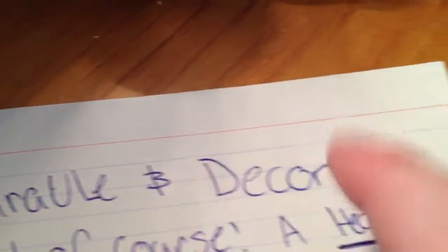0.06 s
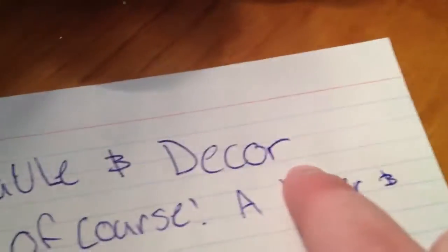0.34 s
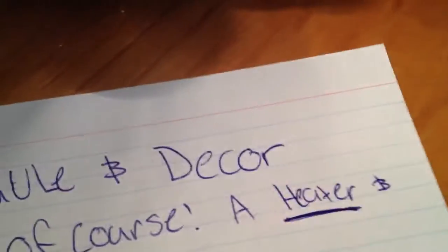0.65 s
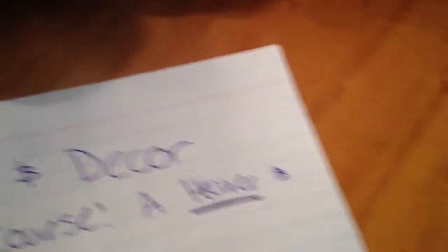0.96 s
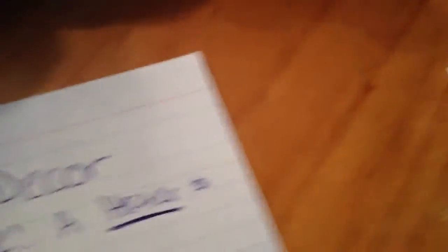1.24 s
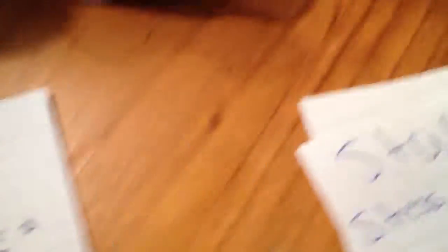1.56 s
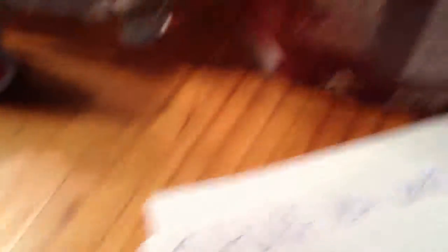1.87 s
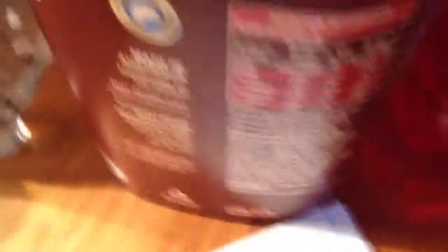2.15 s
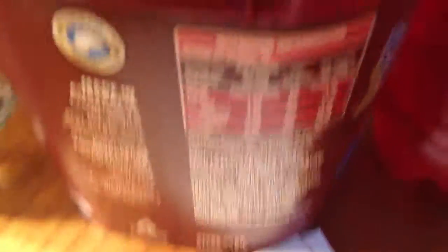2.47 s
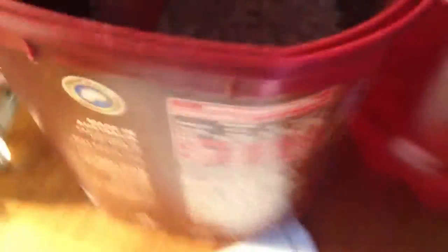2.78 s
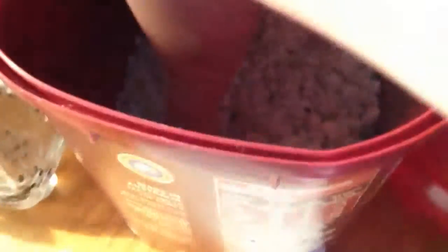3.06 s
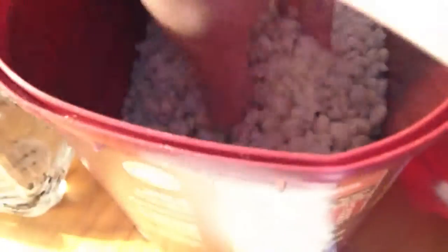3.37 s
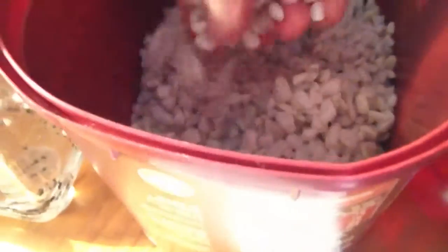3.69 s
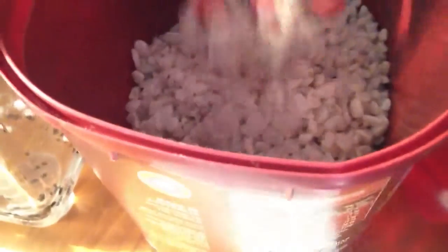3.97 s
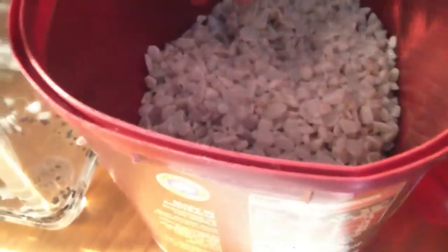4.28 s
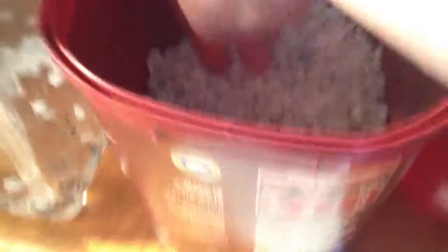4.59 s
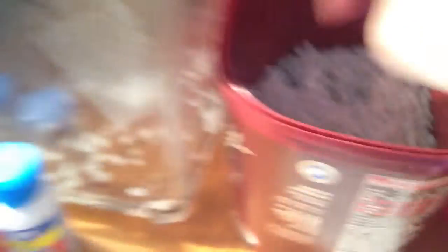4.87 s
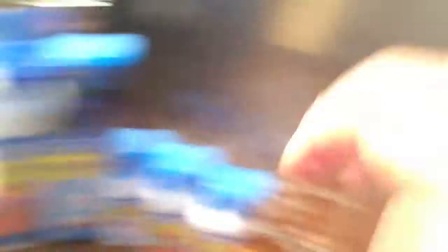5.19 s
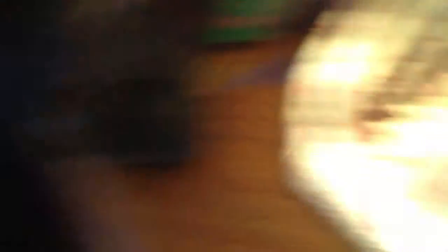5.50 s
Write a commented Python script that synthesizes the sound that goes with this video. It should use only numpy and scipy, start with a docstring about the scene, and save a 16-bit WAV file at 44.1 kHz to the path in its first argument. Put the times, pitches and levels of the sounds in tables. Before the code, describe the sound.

A faint fan hum runs throughout in a quiet, fairly dry room, with everything close to the microphone. At about 0.2 seconds a finger taps a wooden table once, a click with a short thump. The microphone's casing gives a small dry click near 1.1 seconds, and a hand slides softly over paper at 1.3, followed by very faint rustles. Around 2.7 seconds a plastic tub of fine gravel is bumped, giving a cluster of short hollow knocks. From 3.0 fingers dig in, the stones grinding, scraping the wall and slipping off in small spills. The sharpest knocks on the plastic come around 3.8 seconds, as a handful trickles back in a bright spray of tiny ticks, fullest near 4.0 and over by 4.4. From 4.7 to about 5.4 seconds an arm brushes quietly past, with a few soft bumps on the table.

```python
"""A finger taps a wooden table in a quiet room with a humming fan. The microphone's casing clicks
and a hand slides over paper. A plastic tub of fine gravel is bumped; fingers dig in, grinding the
stones together, lift a handful and let it trickle back in a spray of tiny collisions, the larger
stones knocking on the tub and ringing its wall. Then an arm brushes past, with a few soft bumps
on the table."""
import sys
import numpy as np
from scipy import signal
from scipy.fft import rfft, irfft, next_fast_len
from scipy.io import wavfile

SR = 44100
rng = np.random.default_rng(int(sys.argv[2]) if len(sys.argv) > 2 else 0)


def dump_mix(stems):
    """Bounce the given channels to the path in sys.argv[1] as a 16-bit WAV at rate SR."""
    frames = np.atleast_2d(stems).T  # one column per channel
    limited = np.clip(frames, -1, 1)  # hard clip at full scale
    pcm = np.round(limited * 32767).astype(np.int16)
    wavfile.write(sys.argv[1], SR, pcm)


N = 244314
T = np.arange(N) / SR


# Tone of the shaken tub, the grinding heap, the trickle and the larger stones.
# Each row: frequency in Hz, gain in dB.
RUMBLE_EQ = [(90, -28.5), (160, -8.5), (290, 6.5), (420, 0), (600, -12.5), (1200, -41)]
GRIND_EQ = [(240, -48), (400, -17), (480, 1.5), (512, 5), (665, 4), (909, -5.5), (1280, -1), (1740, -3),
            (2480, -6.5), (3760, -9), (4400, -7), (5410, -12.5), (9000, -13.5), (11700, -38), (19800, -120)]
TRICKLE_EQ = [(1500, -28.5), (3000, -16), (5000, -6.5), (7500, 2.5), (10000, 2.5), (13000, 8), (15200, 5.5)]
STONE_EQ = [(300, -23.5), (1200, -3), (3000, -12), (6000, -5), (13000, 3)]
# Larger stones landing on the heap. Each row: start in seconds, level in dB.
STONE_LANDINGS = [(3.552, -42), (3.679, -30), (3.765, -30), (3.773, -24.5), (3.803, -24), (3.875, -26),
                  (3.891, -21), (3.988, -21.5), (4.033, -24), (4.063, -23.5), (4.111, -25.5),
                  (4.155, -34.5), (4.180, -35.5), (4.2224, -36.5), (4.2549, -28.5), (4.324, -31.5),
                  (4.330, -35)]

def gravel():
    """Packed stones grind and shake the tub; loose ones trickle over the top."""
    rumble, grind, scrape, trickle = gravel_envelopes()
    out = rumble * colour(grains(per_s=1700, spread_db=0.5), RUMBLE_EQ)
    out += amp(-0.4) * grind * colour(grains(per_s=2500, spread_db=2.5), GRIND_EQ)
    # stones scraping along the wall set it ringing
    wall = struck(wall_modes(spot_hz=1310)) + struck(wall_modes(spot_hz=2530))
    slips = scrape * rms_one(grains(per_s=650, spread_db=4.5))
    out += amp(-4.0) * resonate(slips, cut(wall, 1200, "high"))
    # a weak trickle thins out into separate ticks
    full_flow_db, thinning, least_flow = -35, 0.8, 0.18
    flow = np.clip((trickle / amp(full_flow_db)) ** thinning, least_flow, 1)
    stone_size = trickle * np.sqrt(flow.mean() / flow)
    ticks = pebbles(per_s=4000 * flow, spread_db=1.0, cycles=3.9)
    out += amp(-1.8) * stone_size * colour(ticks, TRICKLE_EQ)
    # now and then a bigger stone ticks out of the trickle
    out += amp(-11.5) * trickle * colour(pebbles(per_s=160, spread_db=3.5, cycles=4.0), STONE_EQ)
    for s, db in STONE_LANDINGS:
        # the tail is the dislodged stones coming to rest
        landing = crack(0.0038, tail_db=-13.5, tail_t60=0.036, spectrum=STONE_EQ, high_hz=16000)
        add(out, s, amp(db) * landing)
    return out


# Effort of the fingers as they dig in and lift a handful. Each row: time in seconds, level in dB.
DIG_EFFORT = [(2.975, -72), (3.005, -43.5), (3.10, -45), (3.17, -39), (3.225, -43.5), (3.40, -47),
              (3.47, -53.5), (3.58, -56.5), (3.86, -51.5)]
# The packed heap shifts after a jolt. Each row: start in seconds, hold in seconds, level in dB.
HEAP_SHIFTS = [(2.72, 0.011, -53), (2.793, 0.011, -52.5), (2.852, .01, -60), (2.944, 0.015, -50.5),
               (3.806, 0.034, -42), (3.893, .04, -44)]
# Clumps slip off the fingers. Each row: peak time in seconds, level in dB, rise in seconds.
CLUMP_SPILLS = [(3.13, -33, .012), (3.257, -32, .025), (3.376, -34.5, .09), (3.497, -43, .03),
                (4.064, -30.5, .004), (4.258, -36.5, .004), (4.331, -54, .006)]

def gravel_envelopes():
    """Pushed and falling stones together ride the levels of rumble, grind, scrape and trickle."""
    dig_s, dig_db = np.transpose(DIG_EFFORT)
    effort = amp(np.interp(T, dig_s, dig_db, left=-150, right=-150))
    shifts = sum(swell(s, hold, db, rise=0.025, fall=0.051) for s, hold, db in HEAP_SHIFTS)
    spills = sum(swell(s, hold=0.0037, db=db, rise=rise, fall=0.062) for s, db, rise in CLUMP_SPILLS)
    pour = swell(s=3.975, hold=0.11, db=-32, rise=0.29, fall=0.096)   # the hand opens
    pushed = np.hypot(effort, shifts)
    falling = np.hypot(spills, pour)
    # digging loosens the heap, so it sheds more stones; a mere shift sheds few
    loosen_from_s, loosen_takes_s, packed_db, loose_db = 3.063, 0.43, -3.5, 9
    loose = np.interp(T, [loosen_from_s, loosen_from_s + loosen_takes_s], [0, 1])
    shed = effort * amp(packed_db + loose * (loose_db - packed_db)) + shifts * amp(-14)
    # pushed stones shake the tub; falling ones grind and shake it far less
    rumble = np.hypot(amp(-7.5) * pushed, amp(-26) * falling)
    grind = np.hypot(pushed, amp(-15) * falling)
    scrape = grind * amp(-5.5 * loose)   # a loosened heap presses less on the wall
    trickle = np.hypot(shed, falling)
    return rumble, grind, scrape, trickle


def pebbles(per_s, spread_db, cycles, count=24):
    """Collisions dealt to stones of many sizes, each ringing for a few cycles."""
    pitches = np.geomspace(2500, 15000, count)
    return sum(ring(grains(per_s / count, spread_db), hz, cycles / hz) * hz for hz in pitches)


# Knocks on the tub. Each row: start in seconds, strength in dB, brightness of the contact in Hz,
# pitch that the struck spot favours in Hz.
KNOCKS = [ (2.6601, -23.5, 2200, 1400), (2.6685, -29.5, 5500, 2070), (2.7166, -36, 5000, 2100),
          (2.724, -34.5, 6000, 3100), (2.735, -29.5, 5500, 3130), (2.7916, -41, 5000, 1300),
          (2.8606, -38.5, 3300, 2470), (2.945, -43, 3500, 1300), (2.960, -46, 8500, 1300),
          (2.990, -40.5, 9000, 1300), (3.016, -28.5, 5000, 1380), (3.1165, -32, 8000, 2600),
          (3.1294, -33.5, 11000, 2600), (3.1406, -24.5, 5500, 1300), (3.189, -25.5, 6000, 2480),
          (3.534, -34.5, 5500, 570), (3.599, -31, 4500, 440), (3.649, -22.5, 7600, 2370),
          (3.7908, -12.5, 8450, 6500), (3.8069, -20, 8000, 3500), (3.8148, -30.5, 7000, 3800),
          (3.828, -21.5, 8300, 3800), (3.8962, -22, 5800, 680), (3.9225, -33.5, 6500, 700),
          (3.9448, -23.5, 7000, 1320)]
# Tone of a knock's attack. Each row: frequency in Hz, gain in dB.
CRACK_EQ = [(200, -19.5), (700, 0), (1400, -1), (2100, 0), (3100, 0), (4400, 0), (5200, -1), (6800, 2.5),
            (9000, 2), (14000, 5.5)]

def tub():
    """Each knock cracks, rings the plastic wall and thumps the table beneath."""
    out, board = np.zeros(N), struck(BOARD_MODES)
    for s, db, contact_hz, spot_hz in KNOCKS:
        # a harder contact cracks louder, a softer and heavier one thumps the table more
        hardness_octaves = np.log2(contact_hz / 7040)
        crack_db = db - 0.03 + 6.5 * hardness_octaves
        thump_db = db - 30.5 - 13.5 * hardness_octaves
        snap = crack(0.0098, tail_db=-16.5, tail_t60=0.072, spectrum=CRACK_EQ, high_hz=contact_hz)
        add(out, s, amp(crack_db) * snap)
        add(out, s, amp(db) * struck(wall_modes(spot_hz)) / 2)
        add(out, s, amp(thump_db) * board)
    return out


# The ring of the plastic tub. Each row: frequency in Hz, gain in dB, 60 dB decay time in seconds.
PLASTIC_MODES = [(323, -21.5, .09), (494, -9, 0.054), (559, 0.5, 0.027), (658, 1.5, 0.041),
                 (745, -6.5, 0.036), (1090, -11.5, 0.053), (1164, -3.5, 0.02), (1290, -3, 0.021),
                 (1500, -9, 0.033), (2078, -3.5, 0.022), (2300, -14.5, .035), (2425, -9.5, 0.029),
                 (2644, -7, 0.025), (3170, -8, 0.023), (3760, -8.5, 0.018), (4420, -5, 0.021),
                 (5940, -6.5, 0.023), (6750, -14, 0.016), (7540, -4, 0.013)]

def wall_modes(spot_hz, favour_db=10.5, width_octaves=0.48):
    """The struck spot favours the modes near one pitch and barely reaches those far above it."""
    hz, db, t60 = np.transpose(PLASTIC_MODES)
    nearness = np.exp(-(np.log2(hz / spot_hz) / width_octaves) ** 2)
    rolloff_db = -10 * np.log10(1 + (hz / spot_hz) ** 2)
    return list(zip(hz, db + favour_db * nearness + rolloff_db, t60))


# Taps and bumps on the table. Each row: start in seconds, click level in dB, click cut-off in Hz,
# thump level in dB.
TABLE_TAPS = [(0.1572, -27.5, 14900, -24), (2.728, -36.5, 5000, -38.5), (2.749, -70, 1500, -54),
              (2.876, -70, 1500, -46), (4.685, -55, 1500, -43.5), (4.754, -75, 1500, -53.5),
              (4.974, -55, 15000, -75), (5.045, -73, 1500, -48), (5.107, -68, 1500, -57)]
# Tone of a tap's click. Each row: frequency in Hz, gain in dB.
TAP_EQ = [(500, 4), (1100, 0.5), (1700, -1.5), (2400, -14.5), (3200, -3.5), (3800, -14), (4800, -0.5),
          (7300, 2), (9000, -2), (15000, 0.5)]
# The body of the table top. Each row: frequency in Hz, gain in dB, 60 dB decay time in seconds.
BOARD_MODES = [(154, -13.5, 0.12), (222, -7.5, 0.091), (254, -6, 0.1), (328, -3, 0.082),
               (349.3, -15.5, 0.18), (402, -2, 0.039), (535, -15.5, .07), (617, -9, 0.034),
               (760, -17, 0.034)]

def table():
    """A tap clicks first and the wooden board answers with a thump."""
    out, board = np.zeros(N), struck(BOARD_MODES)
    for s, click_db, click_hz, thump_db in TABLE_TAPS:
        click = crack(0.017, tail_db=-17.5, tail_t60=0.06, spectrum=TAP_EQ, high_hz=click_hz)
        add(out, s, amp(click_db) * click)
        add(out, s + 0.00158, amp(thump_db) * board)
    return out


# The microphone's casing. Each row: frequency in Hz, level in dB, 60 dB decay time in seconds.
CLICK_MODES = [(200, -39.5, 0.024), (420, -35, 0.0084), (1040, -37, 0.0094), (1460, -37.5, 0.01),
               (2150, -39.5, 0.0092), (4300, -30.5, 0.0032), (5400, -39, 0.0078), (7360, -35, 0.0034),
               (10700, -39.5, .003)]

def casing_click():
    """One dry click: the casing's modes die away almost at once."""
    return struck(CLICK_MODES)


# A hand slides on paper, an arm brushes past, paper and sleeve rustle, a hand shifts on the casing.
# Each row: start in seconds, hold in seconds, level in dB.
HAND_SLIDE = [(1.262, 0.11, -51)]
ARM_BRUSH = [(4.79, 0.033, -54), (4.88, .14, -52), (5.32, 0.089, -63.5)]
FAINT_RUSTLE = [(.505, 0.011, -65), (1.226, .012, -59.5), (1.845, 0.045, -66), (1.975, 0.065, -64),
                (4.425, 0.049, -67)]
CASING_GRIP = [(0, .06, -68), (2.17, 0.33, -69), (4.46, .22, -68)]
# Tone of those four moves. Each row: frequency in Hz, gain in dB.
SLIDE_EQ = [(76, -41), (130, -24.5), (318, -6), (351, -11), (420, 0.5), (482, -4.5), (650, -5.5),
            (1130, -13), (1230, -9.5), (3520, -22), (6640, -23.5), (15000, -41)]
BRUSH_EQ = [(150, -30), (240, -13), (400, -6.5), (520, -3), (620, -1), (780, -1), (920, -5), (1500, -10.5),
            (2200, -14), (3600, -20), (4350, -17), (5500, -22.5), (9500, -30.5), (15000, -36)]
RUSTLE_EQ = [(2500, -10.5), (4500, -4), (7000, -5.5), (10000, -12.5), (15000, -12.5)]
GRIP_EQ = [(150, -9.5), (400, -5), (1200, 0), (1700, -5.5), (2300, -3), (3000, -15), (8000, -25.5)]

def rubbing():
    """Skin, paper and cloth catch and slip thousands of times a second."""
    out = np.zeros(N)
    for strokes, spectrum in [(HAND_SLIDE, SLIDE_EQ), (ARM_BRUSH, BRUSH_EQ),
                              (FAINT_RUSTLE, RUSTLE_EQ), (CASING_GRIP, GRIP_EQ)]:
        # longer strokes swell and fade more slowly
        speed = sum(swell(s, hold, db, rise=hold, fall=1.04 * hold) for s, hold, db in strokes)
        out += speed * colour(grains(per_s=9000, spread_db=2.0), spectrum)
    return out


# Tone of the room's air. Each row: frequency in Hz, gain in dB.
AIR_EQ = [(40, -25.5), (70, -20.5), (100, -14.5), (160, -14), (280, -10), (450, -11), (620, -17),
          (850, -18.5), (1300, -20.5), (2300, -20.5), (3000, -24), (6000, -25), (10000, -29.5),
          (15000, -25.5)]
# The fan's drone. Each row: centre in Hz, bandwidth in Hz, level in dB.
FAN_RESONANCES = [(419, 97, -76), (975.5, 46, -70)]
# The fan's steady hum. Each row: frequency in Hz, level in dB.
HUM_PARTIALS = [(100.5, -78), (150.3, -80.5), (350, -78.5), (400.5, -73)]

def room_tone():
    """A bed of soft air, two noise-driven resonances of a fan, and the fan's steady hum."""
    out = amp(-67) * colour(rng.standard_normal(N), AIR_EQ)
    for hz, width_hz, db in FAN_RESONANCES:
        t60 = np.log(1000) / (np.pi * width_hz)
        out += amp(db) * rms_one(ring(rng.standard_normal(N), hz, t60))
    for hz, db in HUM_PARTIALS:
        out += amp(db) * np.sqrt(2) * np.sin(2 * np.pi * (hz * T + rng.random()))
    return out


def reverb(x, wet_db, t60, wall_hz):
    """The walls add a weak, dull tail that builds over a few milliseconds."""
    decay = fade(t60)
    reflections = cut(rng.standard_normal(len(decay)), wall_hz, "low", order=1)
    tail = reflections * decay * (1 - fade(0.015))
    return x + amp(wet_db) * resonate(x, tail)


def crack(t60, tail_db, tail_t60, spectrum, high_hz):
    """A hard contact: a short burst and a weaker chatter after it."""
    shape = fade(t60) + amp(tail_db) * fade(tail_t60)
    burst = rng.standard_normal(len(shape)) * shape
    # an impact feeds all frequencies alike; the stone and the surface then colour it
    phase = np.angle(rfft(burst))
    flat = irfft(np.exp(1j * phase), len(shape)) * fade(0.5)
    return colour(cut(flat, high_hz, "low"), spectrum) * np.sqrt(np.mean(shape ** 2))


def struck(modes):
    """The ring of a body; alternating signs let it swell over the first cycles."""
    t = T[:SR // 4]
    return sum((-1) ** k * amp(db) * fade(t60) * np.sin(2 * np.pi * hz * t)
               for k, (hz, db, t60) in enumerate(modes))


def grains(per_s, spread_db):
    """Random tiny collisions, most weak and a few strong."""
    hits = rng.random(N) < per_s / SR
    size = np.minimum(rng.exponential(1, N), 4)
    sign = rng.choice([-1, 1], N)
    return hits * sign * amp(spread_db * size)


def ring(x, hz, t60):
    """A resonator: a unit click sets a sine of height 1 ringing."""
    radius, angle = amp(-60 / (t60 * SR)), 2 * np.pi * hz / SR
    return signal.lfilter([0, np.sin(angle)], [1, -2 * radius * np.cos(angle), radius ** 2], x + 1e-18)


def resonate(x, response):
    """Play x through an impulse response scaled to unit energy."""
    return signal.fftconvolve(x, response / np.sqrt(np.sum(response ** 2)))[:N]


def colour(x, spectrum):
    """Minimum-phase EQ along the given curve; the result has unit power."""
    size = 2 * next_fast_len(len(x) // 2 + 1)
    hz, db = np.transpose(spectrum)
    grid_hz = np.maximum(np.arange(size // 2 + 1) * SR / size, 1)
    gain = amp(np.interp(np.log(grid_hz), np.log(hz), db))
    cepstrum = irfft(np.log(gain))
    cepstrum[size // 2:] = 0   # no ringing ahead of an attack
    response = np.exp(2 * rfft(cepstrum))
    return rms_one(irfft(rfft(x, size) * response)[:len(x)])


def cut(x, hz, kind, order=2):
    """Causal low- or high-pass."""
    return signal.sosfilt(signal.butter(order, np.clip(hz, 10, .45 * SR), kind, fs=SR, output="sos"), x)


def swell(s, hold, db, rise, fall):
    """Attack, hold from time s, release; rise and fall are the seconds for 20 dB."""
    before = np.maximum(s - T, 0) / rise
    after = np.maximum(T - s - hold, 0) / fall
    return amp(db - 20 * np.minimum(before + after, 10))


def fade(t60):
    """A quarter of a second of exponential decay, falling 60 dB in t60 seconds."""
    return np.exp(-np.log(1000) * T[:SR // 4] / t60)


def add(track, s, sound):
    """Mix a sound in at s seconds."""
    at = round(s * SR)
    track[at:at + len(sound)] += sound[:N - at]


def amp(db):
    """Decibels to gain."""
    return 10 ** (np.asarray(db) / 20)


def rms_one(x):
    """Scale to unit power."""
    return x / np.sqrt(np.mean(x ** 2) + 1e-20)


def scene():
    """Everything is within arm's reach; the casing click reaches the microphone without the room."""
    near = gravel() + tub() + table() + rubbing()
    out = reverb(near, wet_db=-16.0, t60=0.21, wall_hz=6100) + room_tone()
    add(out, s=1.0552, sound=casing_click())
    return out[None]


def record(dry):
    """A small microphone with little bass; the highest peaks are rounded and the top end is cut."""
    ceiling, bass_cut_hz, top_cut_hz = 0.46, 92, 15350
    rounded = ceiling * np.tanh(dry / ceiling)
    thin = cut(rounded, bass_cut_hz, "high", order=4)
    return signal.sosfilt(signal.ellip(10, .2, 70, top_cut_hz, fs=SR, output="sos"), thin)


dry = scene()
out = record(dry)
dump_mix(out)
```